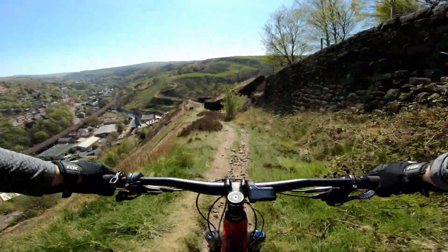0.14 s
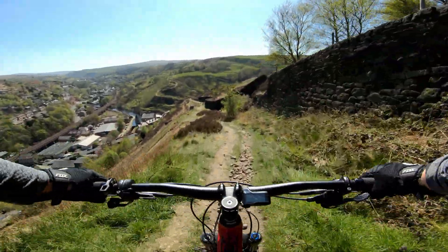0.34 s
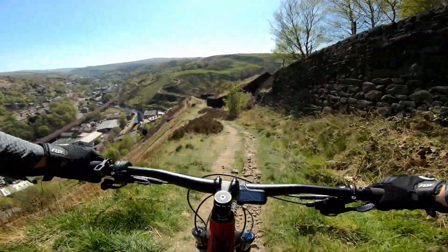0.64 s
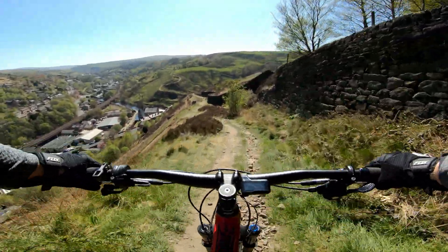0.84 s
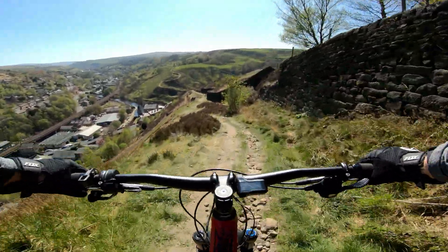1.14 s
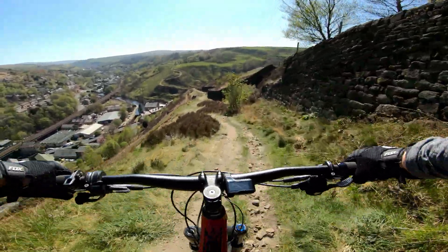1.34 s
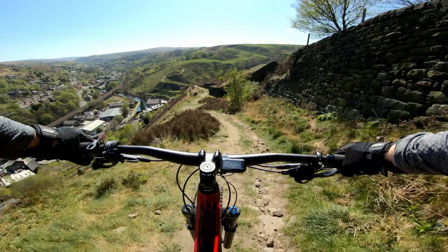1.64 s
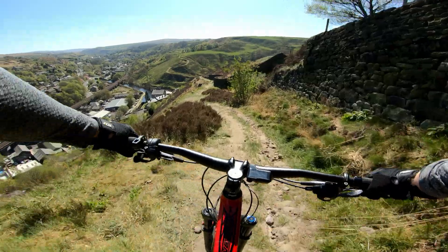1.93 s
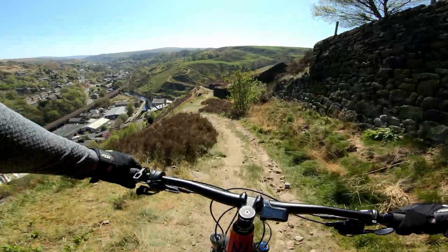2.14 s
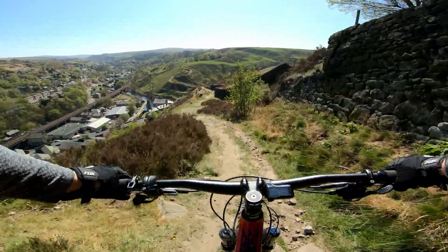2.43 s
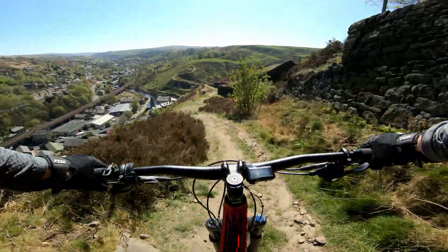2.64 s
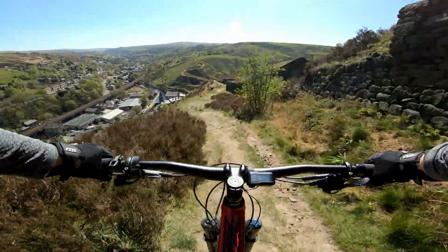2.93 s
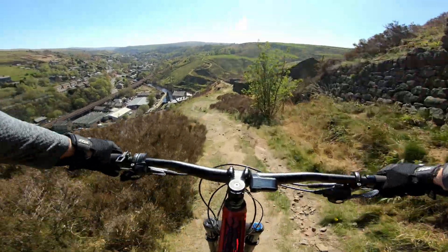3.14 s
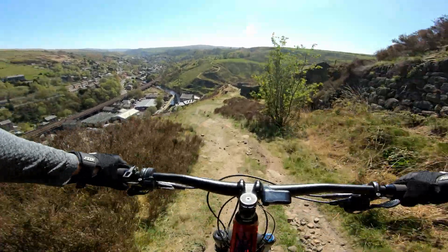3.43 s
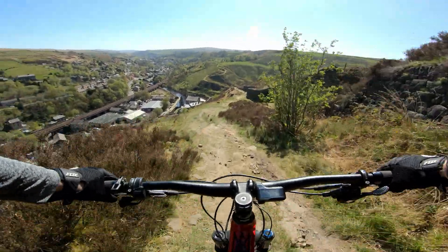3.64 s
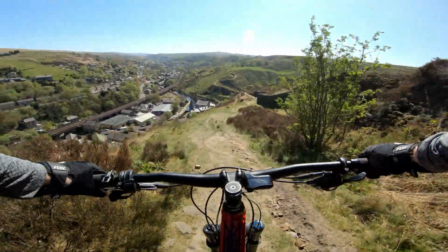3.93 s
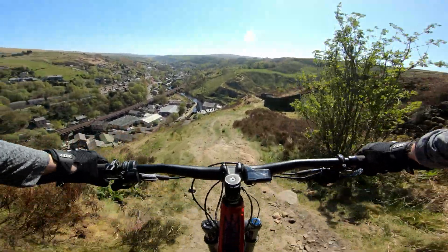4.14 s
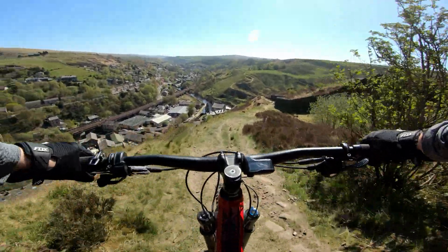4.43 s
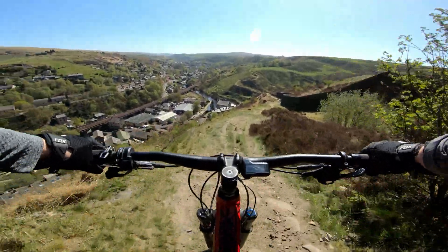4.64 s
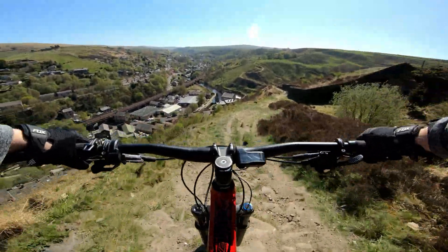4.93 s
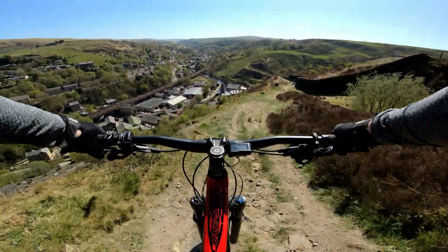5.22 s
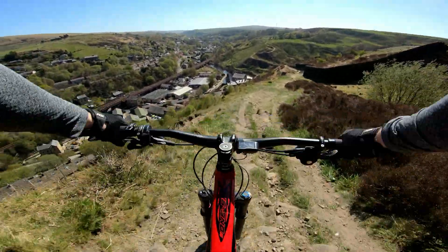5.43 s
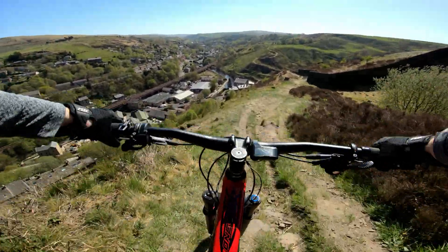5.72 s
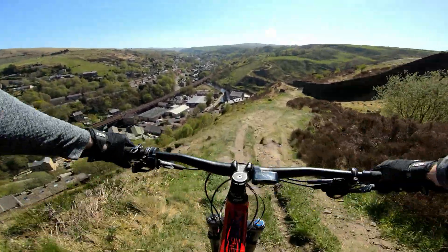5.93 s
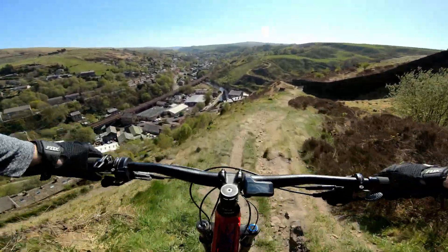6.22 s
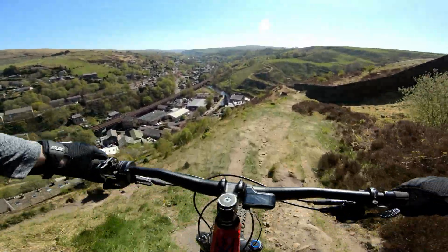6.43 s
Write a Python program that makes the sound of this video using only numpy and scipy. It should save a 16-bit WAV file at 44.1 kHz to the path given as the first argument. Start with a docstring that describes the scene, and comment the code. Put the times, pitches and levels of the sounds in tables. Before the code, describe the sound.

Close outdoor sound from a rider's chest: a mountain bike freewheels down a rocky path. Hollow stone knocks, drumming tyres, crunching grit and chain slaps crowd the first two seconds, with a heavy thud near one second. Packed dirt then brings a quieter brushing roll with a few isolated knocks. After a sharp clack past four seconds, rough wind buffets hard over renewed stony rattling.

```python
"""A mountain bike freewheels down a stony dirt trail, heard from a microphone on the rider's chest.
From the start, random impacts shaped by spectra make drumming tyres, crunching grit, clacking rocks,
a rattling chain and light wind. Damped tones make stones knock; short noise bursts make the chain slap.
Bumps thud, and loose metal jingles near 1 s. From about 2 to 4.5 s the tread brushes packed dirt, with
short scrapes. Over the last two seconds filtered impacts buffet hard, with tones as puffs, and brief lulls."""
import sys
import numpy as np
from scipy import signal
from scipy.fft import rfft, irfft
from scipy.io import wavfile
from scipy.ndimage import uniform_filter1d

SR = 44100
rng = np.random.default_rng(int(sys.argv[2]) if len(sys.argv) > 2 else 0)


def transcribe(signal):
    """Save signal, clipped to [-1, 1], as a 16-bit WAV file at the path in sys.argv[1]."""
    frames = np.atleast_2d(signal).T
    limited = np.clip(frames, -1, 1)
    pcm = np.round(limited * 32767).astype(np.int16)
    wavfile.write(sys.argv[1], SR, pcm)


N = 289725
TIME = np.arange(N) / SR


def gain_of(db):
    """Turns decibels into amplitude."""
    return 10 ** (np.asarray(db) / 20)


def evened(x):
    """Scales a sound to an rms of 1."""
    return x / np.sqrt(np.mean(x ** 2) + 1e-20)


def curve(rows, axis=1):
    """Joins one column of a timed table by straight lines, giving a value for every sample."""
    rows = np.asarray(rows)
    return np.interp(TIME, rows[:, 0], rows[:, axis])


def add(mix, s, sound):
    """Lays a sound into the mix at time s."""
    part = mix[max(round(s * SR), 0):][:len(sound)]
    part += sound[:len(part)]


def swell(start, length, rise_s, fall_s):
    """Goes from 0 to 1 and back, with the ramps centred on the start and the end."""
    rise = (TIME - start) / rise_s
    fall = (start + length - TIME) / fall_s
    return np.clip(np.minimum(rise, fall) + .5, 0, 1)


def wobble(hz):
    """Wanders at random with an rms of 1, mostly slower than hz."""
    f = np.fft.rfftfreq(N, 1 / SR)
    spectrum = rfft(rng.standard_normal(N))
    return evened(irfft(spectrum / (1 + (f / hz) ** 4), N))


def response(points, uneven_db=0., size=4096, order=40):
    """Rings after a tap with the given spectrum, plus random peaks and dips of its own."""
    f, db = np.transpose(points)
    hz = np.fft.rfftfreq(size, 1 / SR) + 1
    ripple = rng.standard_normal(len(hz))
    ripple = evened(uniform_filter1d(uniform_filter1d(ripple, order), order))
    rolloff_db = 14 * np.maximum(np.log2(hz / f[-1]), 0)  # falls away above the last point
    level_db = np.interp(np.log(hz), np.log(f), db) - rolloff_db + uneven_db * ripple
    log_gain = np.log(gain_of(level_db))
    # minimum phase: the ring starts at the tap, never before it
    circle = np.r_[log_gain, log_gain[-2:0:-1]]
    ring = np.fft.ifft(np.exp(np.conj(signal.hilbert(circle)))).real[:size // 2]
    return ring / np.linalg.norm(ring)


def ping(hz, decay_s, rise_s, size=4096):
    """Rings one tone that rises quickly and dies away, under an envelope that peaks at 1."""
    t = TIME[:size]
    shape = np.exp(-t / decay_s) * (1 - np.exp(-t / rise_s))
    return np.sin(2 * np.pi * hz * t) * shape / shape.max()


def impacts(per_s, spread_db):
    """Clicks at random moments, either way up, with sizes that vary by spread_db."""
    size = gain_of(spread_db * np.minimum(rng.exponential(1, N), 4))
    chance = rng.random(N)
    return size * np.sign(chance - .5) * (abs(chance - .5) < per_s / SR / 2)


def grains(points, per_s, spread_db, uneven_db, count=10):
    """Many small impacts, shared among contact points that ring with similar colour."""
    out = np.zeros(N)
    for _ in range(count):
        clicks = impacts(per_s / count, spread_db)
        out += signal.oaconvolve(clicks, response(points, uneven_db))[:N]
    return evened(out)


def pebbles(low_hz, high_hz, cycles, per_s, spread_db, count=16):
    """Small hard things of many sizes clack; each rings for some cycles, the high ones softer."""
    out = np.zeros(N)
    for hz in np.geomspace(low_hz, high_hz, count) * rng.uniform(.96, 1.04, count):
        clicks = impacts(per_s / count, spread_db)
        out += signal.oaconvolve(clicks, ping(hz, cycles / hz, 1 / hz))[:N] / np.sqrt(hz)
    return evened(out)


def steadied(x, span):
    """Takes out level drift slower than span seconds, leaving the quick grain."""
    window = signal.windows.hann(max(int(span * SR), 3))
    power = np.abs(signal.oaconvolve(x ** 2, window / window.sum(), "same"))
    return x / np.sqrt(power + 1e-9)


# how stony the ground is: start_s, share of loose stones against fine grit (0-1)
STONY_SHARE = [(0, 0.2), (.35, 0), (.65, 0.25), (.92, 0.14), (1.25, 0.05), (1.55, 0.74), (1.75, 0.4),
               (2, 0), (2.5, 0.16), (4.5, 0.1), (4.75, 0.33), (5.2, 0.62), (5.7, 0.7), (6.1, 0.52),
               (6.57, 0.66)]


def stony():
    """Share of loose stones under the wheels, never quite none or all."""
    return np.clip(curve(STONY_SHARE), .02, .98)


def jolts(hz):
    """Random shaking, stronger on stony ground than on packed dirt."""
    return wobble(hz) * (1.055 + 0.63 * stony())


# rough patches that shake the bike: start_s, length_s, extra_crunch_db, extra_rattle_db
ROUGH_GROUND = [(0.195, 0.057, 8, -1), (0.318, 0.13, 6.5, 4), (0.52, 0.051, 5, 3), (0.726, 0.04, 7.5, 1),
                (0.851, 0.052, 9.5, 2), (0.985, 0.166, 4, 1), (1.225, 0.17, 5.5, 2), (2.352, 0.02, 5, -2),
                (2.438, 0.036, 7, 4.5), (2.564, 0.18, 4.5, 2.5), (3.578, 0.094, 4, 1.5),
                (4.224, 0.046, 8.5, -3), (4.65, 0.017, 8, 0), (4.947, 0.025, 5.5, 8.5),
                (5.138, 0.16, 4.5, 4.5), (5.328, 0.026, 9, 4.5), (5.423, 0.039, 7, 1),
                (5.534, 0.045, 11, 4), (5.656, 0.142, 9, 0), (5.976, 0.093, 9.5, 3), (6.134, 0.12, 6.5, 1),
                (6.276, 0.055, 7.5, 6.5), (6.442, 0.044, 8.5, 9)]
SHAKE_RISE_S, SHAKE_FALL_S = .014, .016


def shaking(axis):
    """Extra dB while the bike crosses a rough patch."""
    return sum(row[axis] * swell(row[0], row[1], SHAKE_RISE_S, SHAKE_FALL_S) for row in ROUGH_GROUND)


def wheel_load(lift_s, settle_s):
    """The wheel goes light just before each stone, then lands and presses on the ground."""
    load = np.zeros(N)
    for s, *_ in STONE_KNOCKS:
        age = TIME - s
        lift = -.6 * np.exp(-abs(age) / lift_s)
        press = .5 * np.exp(-abs(age) / settle_s)
        load += np.where(age < 0, lift, press)
    return uniform_filter1d(np.clip(load, -1, 1), size=48)


# tyre drumming before shaking, load and jolts: start_s, level_db
DRUM_LEVEL = [(0, -26.5), (.45, -29), (.68, -20.5), (.8, -29), (.9, -18), (.99, -24.5), (1.2, -28),
              (1.62, -29), (1.8, -33), (2.35, -37.5), (2.7, -41.5), (3.15, -30), (3.75, -33), (4.4, -31),
              (4.55, -37.5)]
# colour of the tyre casing: pitch_hz, relative level_db (per Hz)
CASING_COLOUR = [(30, -18), (100, -31), (140, -2.5), (175, -3), (215, 7.5), (275, -2.5), (330, -0.5),
                 (400, -2.5), (480, -3.5), (590, -7), (700, -14.5), (1200, -22.5)]
DRUM_SHAKE = 0.48  # share of the extra crunch that reaches the casing


def drumming(load):
    """The ground drums on the tyre casing, harder under load."""
    drum = steadied(grains(CASING_COLOUR, per_s=900, spread_db=1.5, uneven_db=0.5), 0.042)
    drum_db = curve(DRUM_LEVEL) + DRUM_SHAKE * shaking(axis=2) + 2.0 * load
    return drum * gain_of(drum_db + 2.1 * jolts(21))


# rolling before the rough patches add to it: start_s, grit_crunch_level_db, chain_rattle_level_db
ROLLING_LEVELS = [(0, -31, -55.5), (.28, -43, -55), (.5, -38.5, -55.5), (.8, -36.5, -51.5),
                  (1.05, -36, -43.5), (1.2, -42, -47.5), (1.33, -44, -51), (1.45, -39.5, -52),
                  (1.68, -42.5, -54.5), (1.85, -39.5, -54.5), (2.2, -37.5, -53.5), (2.85, -40, -53.5),
                  (3.2, -35.5, -51), (3.95, -38.5, -48.5), (4.55, -40, -53), (4.8, -42, -59),
                  (5.05, -48, -60.5), (5.65, -45.5, -55.5), (5.93, -50.5, -61.5), (6.57, -44, -58.5)]
# colour of fine grit: pitch_hz, relative level_db (per Hz)
GRIT_COLOUR = [(200, -13), (480, 8), (700, 7.5), (1000, 7.5), (1380, 2), (1800, 4), (2150, 3.5), (2380, 0),
               (2660, 3.5), (2900, -3.5), (3200, -3), (3800, -15), (4700, -13.5), (6500, -19),
               (11000, -40.5)]
# colour of loose stones: pitch_hz, relative level_db (per Hz)
STONE_COLOUR = [(200, -34), (400, -8), (560, -5.5), (700, -13), (900, 9.5), (1250, -7), (1600, -1.5),
                (2200, -9), (3100, -6.5), (3900, -15), (8000, -61)]


def crunch(load):
    """Tyre knobs crush grit and flick loose stones, which clack; all harder under load."""
    level = gain_of(curve(ROLLING_LEVELS) + shaking(axis=2) + 2 * load)
    grit = grains(GRIT_COLOUR, per_s=1900, spread_db=1.5, uneven_db=2.5)
    grit = grit * gain_of(2.93 * jolts(19.6))
    stones = grains(STONE_COLOUR, per_s=660, spread_db=-0.5, uneven_db=8.5, count=16)
    stones = steadied(stones, .05) * gain_of(-2.5 + 2.0 * jolts(30))
    clacks = pebbles(low_hz=741, high_hz=3670, cycles=2.3, per_s=150, spread_db=4.0, count=12)
    clacks = steadied(clacks, 0.061) * gain_of(-3.5)
    return level * (np.sqrt(1 - stony()) * grit + np.sqrt(stony()) * (stones + clacks))


# beds of larger rocks, before the wheel load: start_s, length_s, level_db
ROCKY_STRETCHES = [(0, 0.088, -31.5), (0.105, 0.93, -38.5), (0.867, 0.33, -39), (1.475, 0.14, -33),
                   (1.66, 0.086, -39), (2.63, 0.12, -42), (4.635, 0.148, -38), (5.525, 0.13, -32.5),
                   (5.679, 0.066, -29), (5.751, 0.15, -38.5)]
ROCK_RISE_S, ROCK_FALL_S = 0.014, 0.016


def rocks(load):
    """Larger rocks clack together under the wheels, each ringing at its own pitch."""
    beds = np.zeros(N)
    for s, length, db in ROCKY_STRETCHES:
        beds += gain_of(db) * swell(s, length, ROCK_RISE_S, ROCK_FALL_S)
    clacks = pebbles(low_hz=518.4, high_hz=1745, cycles=6.9, per_s=450, spread_db=0.5, count=12)
    return steadied(clacks, 0.03) * beds * gain_of(2 * load)


# chain slaps, before a shared 3.5 dB boost: start_s, level_db
CHAIN_SLAPS = [(0.341, -31.5), (0.369, -32.5), (0.5462, -33), (0.5662, -28.5), (0.971, -31),
               (1.1077, -26.5), (1.139, -33), (1.186, -33.5), (1.296, -26.5), (4.257, -27), (5.182, -36),
               (5.219, -32.5), (5.618, -33.5), (5.752, -37)]
# colour of the chain: pitch_hz, relative level_db (per Hz)
CHAIN_COLOUR = [(800, -26.5), (2000, 6.5), (3200, 3.5), (3850, 2.5), (4800, 5), (5700, -6), (7400, -9.5),
                (8550, -9.5), (9300, -27), (10300, -28), (12000, -19.5), (14000, -34)]
LINK_HZ = 8000  # thin ring of the steel drivetrain


def chain():
    """Links chatter and tinkle as the bike shakes; the chain slaps the stay and rings briefly."""
    chatter = grains(CHAIN_COLOUR, per_s=3200, spread_db=-0.5, uneven_db=1.0)
    chatter = chatter * gain_of(2.5 + 2.0 * jolts(26))
    tinkle = pebbles(low_hz=3230, high_hz=5580, cycles=21, per_s=290, spread_db=5.5, count=14)
    tinkle = tinkle * gain_of(-1.0) * np.sqrt(stony())
    out = (chatter + tinkle) * gain_of(curve(ROLLING_LEVELS, axis=2) + shaking(axis=3))
    t = TIME[:4096]
    # a sharp hit with a weaker, longer tail
    shape = (np.exp(-t / 0.0019) + 0.2 * np.exp(-t / 0.0088)) * (1 - np.exp(-t / 0.0019))
    for s, db in CHAIN_SLAPS:
        links = rng.standard_normal(len(t)) * shape
        slap = signal.fftconvolve(links, response(CHAIN_COLOUR, uneven_db=2.5))[:len(t)]
        ring = .06 * ping(LINK_HZ, 0.0051, 0.00044)
        add(out, s, gain_of(db + 3.5) * (slap / abs(slap).max() + ring))
    return out


# gusts: start_s, length_s, extra_pressure_db, extra_tearing_db
WIND_GUSTS = [(0.853, 0.18, 8.5, 2), (2.148, 0.072, 16.5, 0), (2.521, 0.028, 9, 0), (2.64, 0.063, 11, 0),
              (2.777, 0.095, 8, 0), (3.267, 0.061, 11, 0), (4.244, 0.074, 7.5, 0), (4.589, 0.17, 3.5, 13.5),
              (4.755, 0.096, 4, 11), (4.89, 0.035, 8.5, 5), (4.95, 0.22, 4, 8), (5.127, 0.11, 3.5, 7),
              (5.335, 0.014, 12, 16), (5.369, 0.016, 7.5, 18), (5.444, 0.12, 3, 12.5),
              (5.523, 0.2, 6.5, 13), (5.751, 0.19, 4.5, 10.5), (6.02, 0.098, 7, 10.5),
              (6.149, 0.015, -5, 16.5), (6.201, 0.059, 11.5, 11), (6.439, 0.059, 7.5, 15),
              (6.545, .04, 3, 11.5)]
GUST_RISE_S, GUST_FALL_S = 0.0073, 0.022


def gusting(axis):
    """Extra dB while a gust passes; the largest value counts, and it never goes below 0."""
    return np.max([row[axis] * swell(row[0], row[1], GUST_RISE_S, GUST_FALL_S) for row in WIND_GUSTS], axis=0)


# air pressure on the microphone before gusts and lulls: start_s, level_db
WIND_LEVEL = [(0, -45), (.7, -43.5), (1.4, -37.5), (2.1, -38), (2.75, -40), (3.05, -45.5), (3.4, -34.5),
              (3.62, -39), (3.75, -53), (3.96, -46), (4.08, -39), (4.42, -32.5), (4.58, -20.5),
              (5.3, -25.5), (5.7, -21.5), (6.1, -28), (6.57, -26.5)]
# colour of light wind: pitch_hz, relative level_db (per Hz)
LIGHT_WIND_COLOUR = [(4, -39), (15, -9.5), (35, -1.5), (70, -4), (110, -6.5), (200, -11)]
# colour of strong wind: pitch_hz, relative level_db (per Hz)
STRONG_WIND_COLOUR = [(4, -37), (15, -4), (30, -8), (60, 2), (105, -2.5), (150, -5), (220, -13.5),
                      (350, -28.5)]
# colour of the small eddies: pitch_hz, relative level_db (per Hz)
EDDY_COLOUR = [(60, -30.5), (150, 11), (280, 9), (500, -1), (750, -10.5), (1100, -19), (1700, -31),
               (2500, -29.5), (6000, -87)]
EDDY_DB = -15  # eddies at the microphone port against the wind, before gusts
EXPOSED_S, EXPOSED_RISE_S = 4.45, 0.16  # the trail comes out on the open hillside


def air_lumps(colour):
    """Random pushes of air, coloured by one kind of wind."""
    clicks = impacts(per_s=1200, spread_db=2.0)
    return evened(signal.oaconvolve(clicks, response(colour))[:N])


def wind():
    """Lumps of air pressure rock the diaphragm; in the open, small eddies tear off the strongest."""
    exposed = np.clip((TIME - EXPOSED_S) / EXPOSED_RISE_S, 0, 1)
    light, strong = air_lumps(LIGHT_WIND_COLOUR), air_lumps(STRONG_WIND_COLOUR)
    lumps = steadied(np.sqrt(1 - exposed) * light + np.sqrt(exposed) * strong, 0.041)
    tearing = grains(EDDY_COLOUR, per_s=640, spread_db=4.0, uneven_db=6.5, count=8)
    tearing = steadied(tearing * (1.4 + abs(lumps)) * gain_of(2.7 * wobble(45)), 0.2)
    pressure = lumps * gain_of(gusting(axis=2))
    eddies = tearing * exposed * gain_of(EDDY_DB + gusting(axis=3))
    return gain_of(curve(WIND_LEVEL)) * (pressure + eddies)


# stones striking wheel and frame; the hollow level is before a shared 3 dB cut:
# start_s, hollow_level_db, hollow_pitch_hz, clack_pitch_hz, clack_level_db
STONE_KNOCKS = [(0.047, -20, 615, 1430, -22), (0.063, -9.5, 483, 1360, -24), (0.157, -17, 440, 1580, -24),
                (0.197, -31, 450, 1610, -24), (0.212, -12, 430, 1450, -26), (0.281, -19, 590, 1310, -27),
                (0.326, -13.5, 540, 2480, -23.5), (0.3693, -13.5, 607, 2870, -41),
                (0.5214, -14.5, 523, 1470, -31), (0.541, -12, 550, 1330, -29), (0.5561, -8, 528, 2700, -26),
                (0.625, -9, 800, 1200, -20.5), (0.642, -16, 484, 1490, -30), (0.68, -23, 450, 1950, -26),
                (0.7016, -32, 704, 2500, -24), (0.739, -17, 580, 2700, -30), (0.838, -16, 557, 2540, -27),
                (0.8996, -10.5, 634, 2580, -28), (1.0199, -9, 440, 1750, -28), (1.046, -10, 482, 1300, -33),
                (1.073, -10, 606, 2340, -29), (1.142, -14.5, 550, 2240, -29),
                (1.263, -40, 600, 2500, -24.5), (1.3214, -15, 610, 2720, -20),
                (1.5019, -10, 555, 1280, -24), (1.5738, -17, 587, 1240, -29), (1.712, -28, 517, 1370, -23),
                (2.09, -35, 640, 1510, -24), (2.159, -18, 650, 2850, -29), (2.2789, -36, 910, 1910, -21.5),
                (2.5491, -28, 1220, 1960, -23), (2.7604, -19, 564, 2670, -42), (2.817, -23, 620, 1700, -27),
                (2.868, -16, 543, 2580, -37), (3.191, -21, 520, 1250, -22), (4.234, -7, 487, 1990, -16),
                (4.2514, -12, 490, 2100, -35), (4.6165, -17, 564, 1000, -25),
                (4.668, -15.5, 490, 2280, -22), (4.7148, -11.5, 475, 1560, -30),
                (5.066, -23, 620, 1300, -39), (5.121, -23, 450, 1400, -31), (5.276, -23.5, 560, 1000, -36),
                (5.372, -27, 453, 1410, -37), (5.467, -23, 530, 1410, -26), (5.5344, -14, 900, 1300, -25),
                (5.565, -17, 536, 1450, -34), (5.671, -14, 452, 1340, -26), (5.7, -30, 600, 1600, -25),
                (5.7223, -14, 720, 1360, -31), (5.816, -16, 830, 1270, -30), (5.857, -22, 694, 1500, -32),
                (5.894, -22, 520, 1300, -33.5), (6.152, -21, 457, 900, -31.5),
                (6.2846, -23.5, 720, 1400, -26)]
# a stone rocks back and touches again; each stone varies the delay by 0.7 to 1.4 times
REBOUND_S, REBOUND_DB = .007, -9.5


def knocks():
    """A stone gives a hollow knock over a duller thump, a clack and a spray of grit, then rebounds."""
    out, t = np.zeros(N), TIME[:4096]
    shape = (np.exp(-t / 0.0033) + 0.13 * np.exp(-t / 0.0084)) * (1 - np.exp(-t * 1000))
    variety = 2 ** rng.uniform(-.5, 0.506, (len(STONE_KNOCKS), 2))  # ring length, rebound delay
    for row, (ring, delay) in zip(STONE_KNOCKS, variety):
        s, hollow_db, hollow_hz, clack_hz, clack_db = row
        scrape = rng.standard_normal(len(t)) * shape
        spray = signal.fftconvolve(scrape, response(GRIT_COLOUR))[:len(t)]
        clack = .7 * ping(clack_hz, .0017 * ring, .0007) + .8 * spray / abs(spray).max()
        thump = .4 * ping(.58 * hollow_hz, 2 * ring / hollow_hz, .001)
        hollow = ping(hollow_hz, 1.5 * ring / hollow_hz, .001) + thump
        knock = gain_of(hollow_db - 3.0) * hollow + gain_of(clack_db) * clack
        add(out, s, knock)
        add(out, s + REBOUND_S * delay, gain_of(REBOUND_DB) * knock)
    return out


# chips of stone cracking out from under the tyres: start_s, peak_level_db
STONE_SNAPS = [(0.067, -30), (0.558, -21), (.5646, -20), (.8624, -20), (0.8886, -24), (1.0646, -20),
               (1.0855, -28), (1.3543, -25), (1.377, -22), (4.561, -29), (4.592, -30), (4.6684, -16)]
# colour of a cracking chip: pitch_hz, relative level_db (per Hz)
CRACK_COLOUR = [(300, -7), (1000, 0), (2400, -11), (4000, -6), (6000, -23), (8500, -32)]


def snaps():
    """A pinched chip of stone cracks out from under the tyre."""
    out = np.zeros(N)
    for s, db in STONE_SNAPS:
        crack = response(CRACK_COLOUR, uneven_db=5)
        add(out, s, gain_of(db) * crack / abs(crack).max())
    return out


# bumps thudding through tyres and suspension, before a shared 3 dB cut: start_s, level_db, pitch_hz
BUMP_THUDS = [(0.446, -14, 222), (0.904, -10, 241), (0.915, -4, 250), (0.926, -6, 346), (0.942, -20, 233),
              (1.018, -13, 305), (1.398, -21, 277), (1.596, -13.5, 215), (1.712, -17.5, 237),
              (1.844, -15, 214), (1.872, -18, 218), (2.164, -19, 101), (3.293, -11.5, 185)]


def bumps():
    """The tyre is pushed in and rings for a few cycles."""
    out, t = np.zeros(N), TIME[:4096]
    for s, db, hz in BUMP_THUDS:
        age = t * hz / 1.5
        push = age * np.exp(1 - age)
        add(out, s, gain_of(db - 3.0) * push * np.sin(2 * np.pi * hz * t))
    return out


# loose metal parts jingling: start_s, length_s, level_db, pitch_hz
METAL_JINGLES = [(0.988, 0.023, -45, 5040), (1.248, 0.06, -45, 5260)]
JINGLE_SPREAD, JINGLE_RISE_S, JINGLE_FALL_S = 1.09, .006, 0.022  # spread: pitch ratio either side


def jingles():
    """Loose metal parts buzz briefly, each around its own pitch."""
    out = np.zeros(N)
    for s, length, db, hz in METAL_JINGLES:
        low_hz, high_hz = hz / JINGLE_SPREAD, hz * JINGLE_SPREAD
        buzz = pebbles(low_hz, high_hz, cycles=7.5, per_s=530, spread_db=-2.0, count=5)
        out += gain_of(db) * swell(s, length, JINGLE_RISE_S, JINGLE_FALL_S) * buzz
    return out


# brushing of the tread on packed dirt: start_s, level_db
PACKED_DIRT_LEVEL = [(1.7, -65), (2.1, -40.5), (2.5, -42), (2.95, -38), (3.3, -33.5), (3.85, -33),
                     (4.15, -34.5), (4.42, -42.5), (4.9, -85.5)]
# colour of the tread on packed dirt: pitch_hz, relative level_db (per Hz)
TREAD_COLOUR = [(250, -19), (430, 8.5), (480, 10.5), (600, 9), (680, -2.5), (900, -3.5), (1360, -20.5),
                (1700, 0), (2120, -0.5), (2380, -18), (2560, -1), (2690, 0.5), (2830, -0.5), (3020, -22),
                (3300, -12), (3700, -29), (4600, -18.5), (5300, -31), (5800, -37)]


def tread(count=3):
    """Rows of knobs brush the dirt and ring in narrow bands, drifting and swelling as the tyre flexes."""
    out = np.zeros(N)
    for _ in range(count):
        brush = grains(TREAD_COLOUR, per_s=1000, spread_db=1.5, uneven_db=4.0, count=2)
        flexed = TIME + np.cumsum(.025 * wobble(7)) / SR  # uneven time bends the pitch
        out += np.interp(flexed, TIME, brush) * gain_of(3.3 * wobble(17))
    return evened(out) * gain_of(curve(PACKED_DIRT_LEVEL))


# the tyre scrapes sideways over grit: start_s, length_s, level_db, pitch_hz
TYRE_SCRAPES = [(2.442, 0.023, -31.5, 2150), (3.93, .06, -37.5, 2050), (4.48, 0.14, -40.5, 2400)]
SCRAPE_SPREAD, SCRAPE_EDGE_S = 1.2, 0.02  # pitch ratio either side; rise and fall time


def scrapes():
    """Grit slides under the knobs: a dense, bright rasp gathered around one pitch."""
    out = np.zeros(N)
    for s, length, db, hz in TYRE_SCRAPES:
        low_hz, high_hz = hz / SCRAPE_SPREAD, hz * SCRAPE_SPREAD
        rasp = pebbles(low_hz, high_hz, cycles=5, per_s=900, spread_db=1.5, count=5)
        out += gain_of(db) * swell(s, length, SCRAPE_EDGE_S, SCRAPE_EDGE_S) * rasp
    return out


# single hard puffs on the microphone: start_s, level_db (of the main push), pitch_hz
AIR_PUFFS = [(4.557, -15, 61.4), (4.704, -9, 108), (4.759, -6, 95), (4.972, -10.5, 70.5), (5.031, -16, 89),
             (5.145, -11.5, 90), (5.227, -10, 121), (5.34, -12.5, 59.4), (5.548, -7, 120), (5.778, -8, 108),
             (5.82, -6, 98), (5.865, -8, 106), (6.212, -18, 93), (6.448, -11, 65)]


def puffs():
    """A lump of air hits the microphone port: a quick push and rebound, with a weaker, higher one."""
    out = np.zeros(N)
    for s, db, hz in AIR_PUFFS:
        push = ping(hz, 0.48 / hz, 0.093 / hz)
        flutter = .3 * ping(3.23 * hz, 0.37 / hz, 0.057 / hz)
        add(out, s, gain_of(db) * (push + flutter))
    return out


# lulls between buffets: start_s, length_s, wind_change_db
WIND_LULLS = [(4.904, .026, -8.5), (5.078, 0.057, -7), (5.304, 0.032, -10), (5.396, 0.029, -3.5),
              (6.388, 0.036, -5)]
LULL_EDGE_S = 0.01


def lulls():
    """Amplitude of the wind: it drops away briefly between buffets."""
    return gain_of(sum(db * swell(s, length, LULL_EDGE_S, LULL_EDGE_S) for s, length, db in WIND_LULLS))


def scene():
    """Bike and wind, all close to one microphone."""
    load = wheel_load(lift_s=0.016, settle_s=0.0054)
    tyres = drumming(load) + crunch(load) + rocks(load) + tread() + scrapes()
    bike = tyres + chain() + knocks() + snaps() + bumps() + jingles()
    return (bike + wind() * lulls() + puffs())[None]


EDGE_HZ = 15300  # top of the microphone's range


def record(dry):
    """Softens both ends and takes away the treble above the band limit."""
    dry = dry * signal.windows.tukey(N, .001)
    low_pass = signal.firwin(511, EDGE_HZ, window=("kaiser", 9), fs=SR)
    return signal.oaconvolve(dry, low_pass[None], "same")


dry = scene()
out = record(dry)
transcribe(out)
```